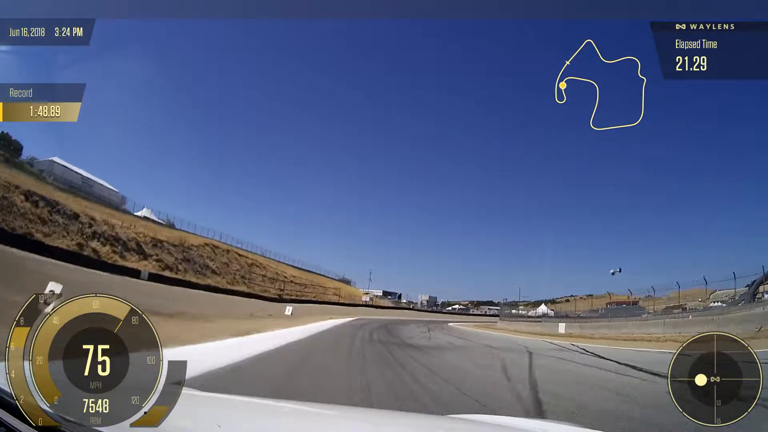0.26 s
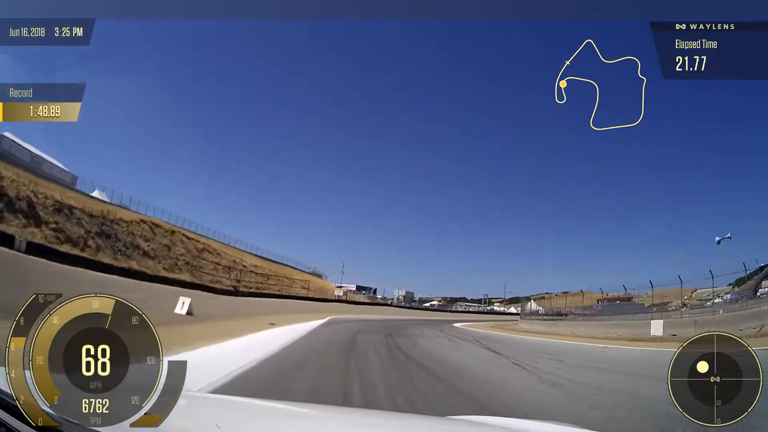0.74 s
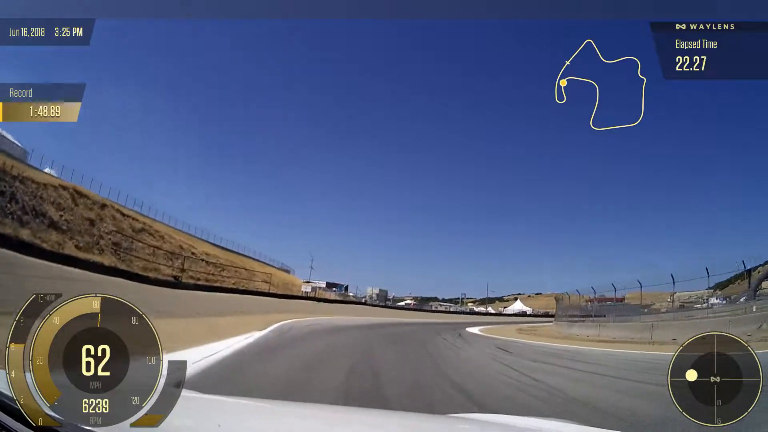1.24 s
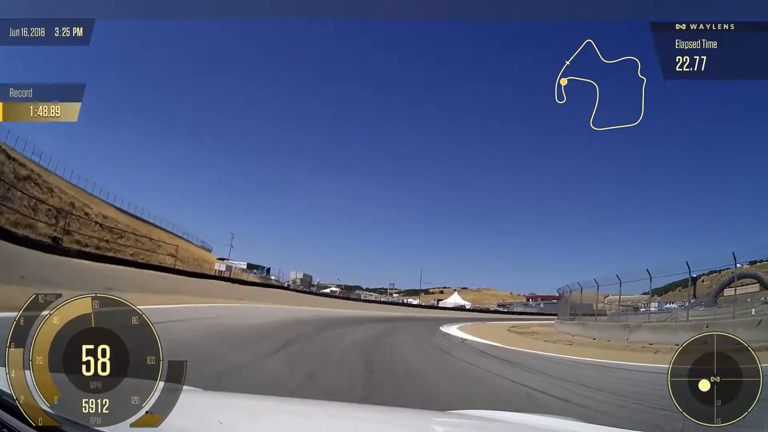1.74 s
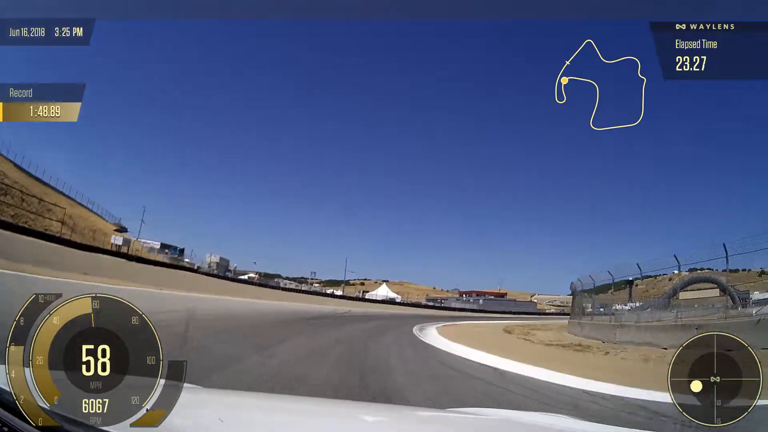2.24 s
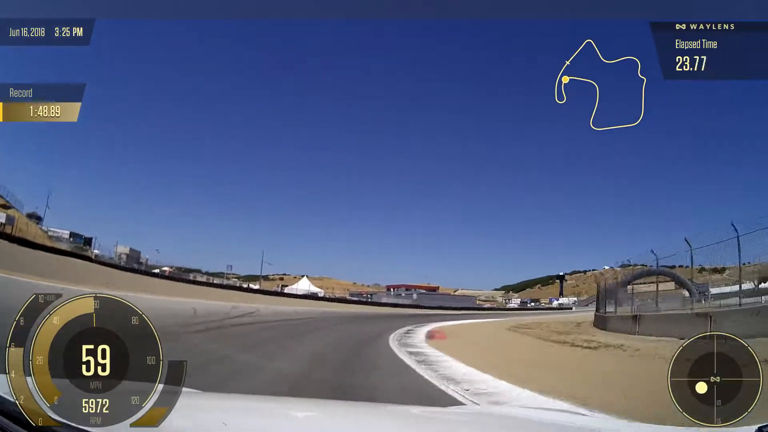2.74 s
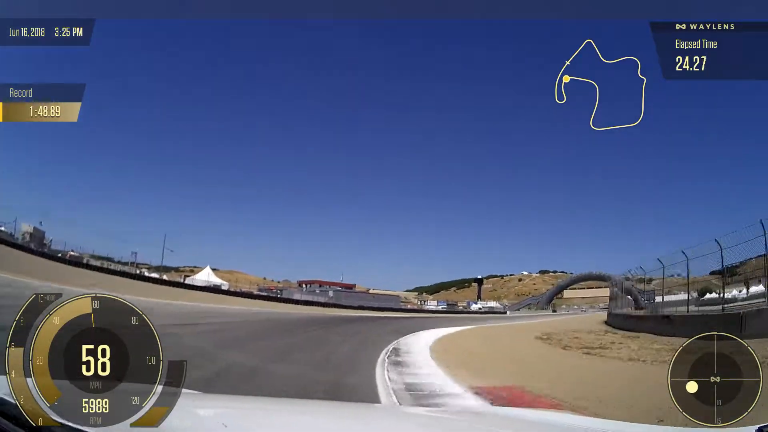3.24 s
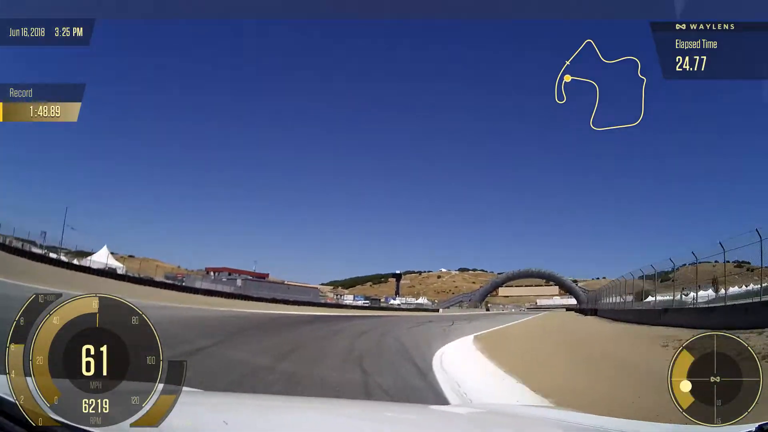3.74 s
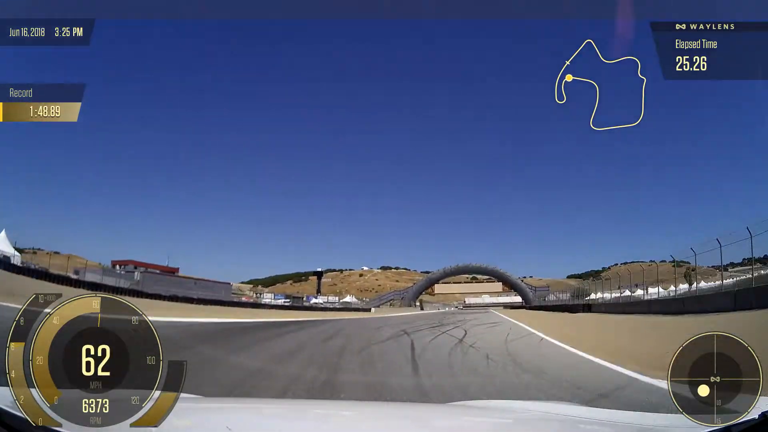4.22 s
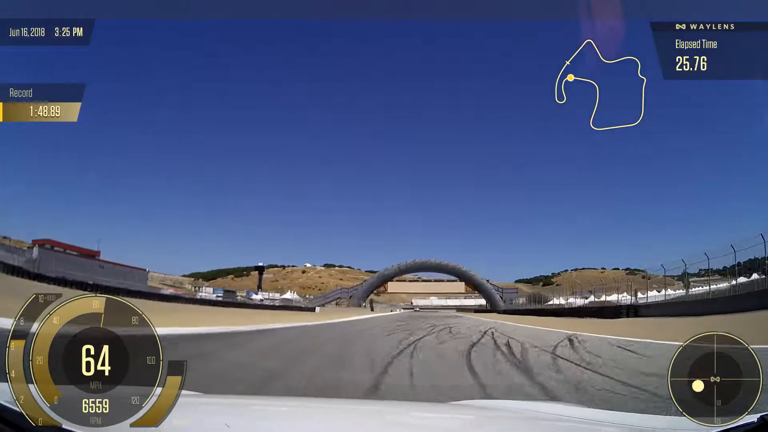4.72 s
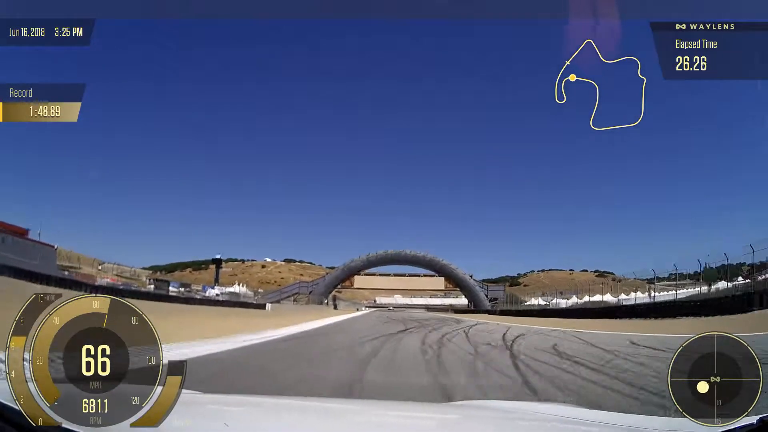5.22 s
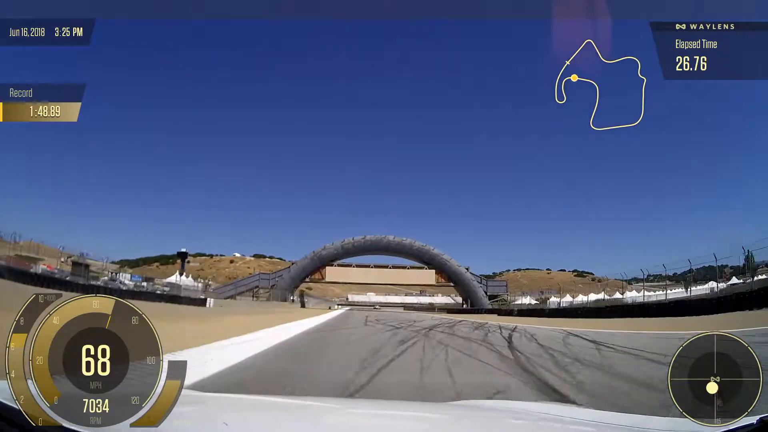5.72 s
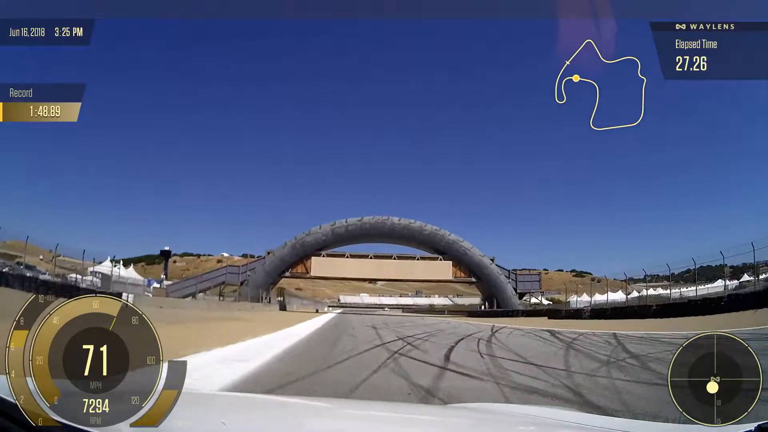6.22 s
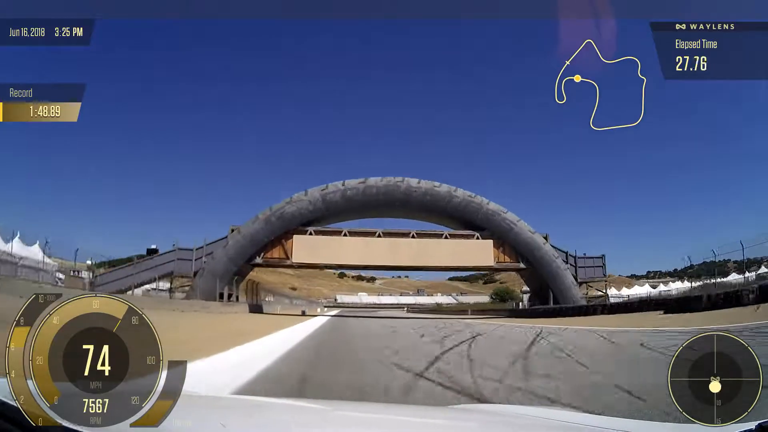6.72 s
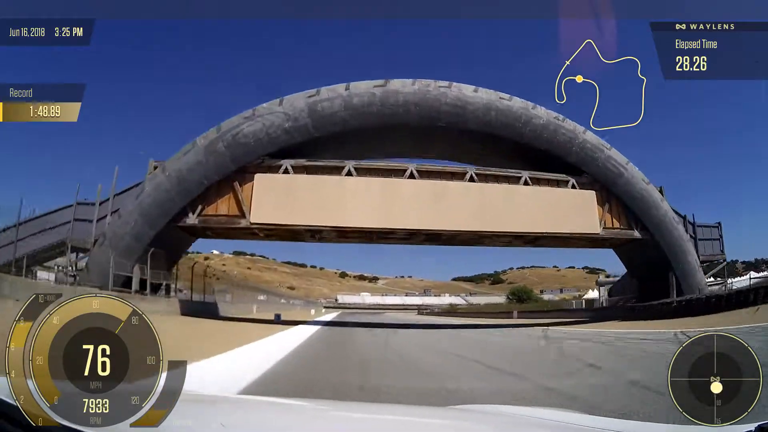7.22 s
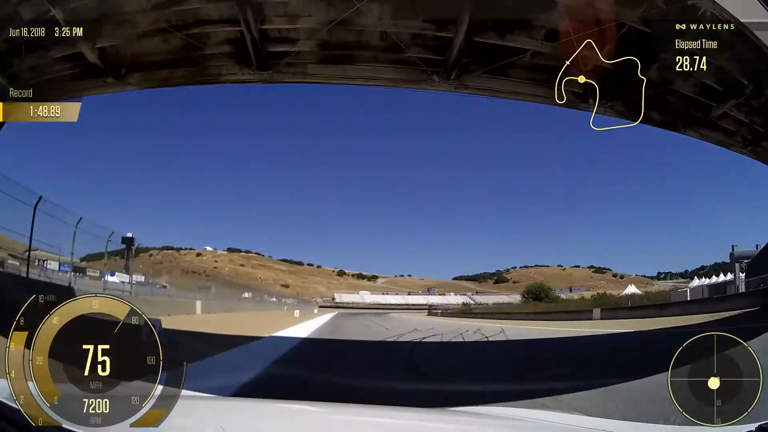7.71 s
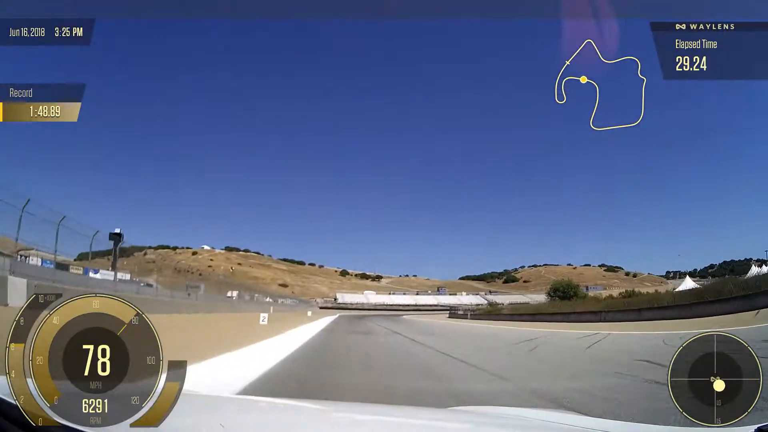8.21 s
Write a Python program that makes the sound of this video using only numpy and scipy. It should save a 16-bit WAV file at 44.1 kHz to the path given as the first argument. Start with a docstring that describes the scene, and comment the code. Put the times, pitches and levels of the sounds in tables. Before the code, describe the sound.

Inside a track car, a high-revving engine drops in pitch, coasts, climbs at full throttle and changes up over road rumble.

```python
"""A four-cylinder engine drones down on overrun, heard in the cabin as the car brakes on a race track.
It coasts through a bend, pulls to the top of the gear and shifts up. Harmonics of the engine cycle
sound through the body resonances and burble on abrupt load changes, over road rumble, tyre roar and
wind hiss. Loose trim ticks, the cabin knocks now and then, and the engine stumbles once with a thump."""
import sys
import numpy as np
from scipy import signal
from scipy.io import wavfile
from scipy.ndimage import uniform_filter1d

SR = 44100
rng = np.random.default_rng(int(sys.argv[2]) if len(sys.argv) > 2 else 0)


def transcribe(signal):
    """Save signal, clipped to [-1, 1], as a 16-bit WAV file at the path in sys.argv[1]."""
    frames = np.atleast_2d(signal).T
    limited = np.clip(frames, -1, 1)
    pcm = np.round(limited * 32767).astype(np.int16)
    wavfile.write(sys.argv[1], SR, pcm)


N = 373086

FIRING, OCTAVE = 4, 8  # harmonics of the engine cycle (two crank turns)
SHIFT_S, CRUISE_HZ = 7.3, 50
# (time [s], cycle rate [Hz], firing tone level [dB])
ENGINE_RUN = [(0.0, 72.35, -19.5), (0.09, 63.6, -22), (0.13, 63.87, -17.5), (0.25, 62, -26),
              (0.6, 56.77, -28), (0.82, 55.6, -25), (1.08, 52.79, -19.5), (1.46, 50.21, -19),
              (1.81, 48.97, -20), (2.0, 49.32, -20.5), (2.28, 50.14, -23.5), (2.52, 48.88, -35),
              (2.6, 49.82, -22.5), (2.9, 49.7, -28.5), (3.2, 49.95, -24.5), (3.41, 50.6, -15.5),
              (3.6, 51.44, -15), (3.8, 51.88, -17), (4.2, 52.78, -14), (4.59, 54.2, -14.5),
              (4.95, 55.5, -16), (5.18, 56.42, -17), (5.8, 58.9, -17.5), (7.02, 64.58, -19.5),
              (7.28, 65.76, -17.5), (7.33, 67.1, -28), (7.46, 65.45, -25), (7.52, 63.6, -32),
              (7.59, 61.96, -17), (7.72, 58.82, -29.5), (7.84, 56.26, -13), (7.93, 53.4, -13.5),
              (7.99, 51.79, -14), (8.2, 52.4, -13.5), (8.29, 52.77, -16), (8.4, 53.0, -18),
              (8.46, 52.2, -28)]
# (time [s], throttle opening [0-1])
PEDAL = [(0, 0.5), (.2, 0.04), (2.04, 0.08), (2.1, 0.29), (3.18, 0.24), (3.33, 0.58), (4.05, 0.77),
         (4.2, 0.98), (7.27, 0.96), (7.31, 0.51), (7.5, 0.23), (7.74, 0.23), (7.84, 1), (8.34, 0.96),
         (8.46, 0.67)]
# octave of the firing tone: (time [s], level [dB])
OCTAVE_LEVEL = [(0, -33.5), (.3, -43), (.7, -35.5), (1.3, -31), (1.7, -33), (2.1, -32), (2.8, -35.5),
                (3.12, -41), (3.22, -34), (3.3, -24), (3.42, -23), (3.54, -23), (3.58, -35), (3.63, -24),
                (3.69, -41), (3.74, -27), (3.92, -31), (4.14, -43), (4.34, -29.5), (4.6, -29), (4.9, -48),
                (5.25, -30), (5.6, -35.5), (6.0, -39), (6.35, -32), (6.75, -32.5), (7.1, -40.5),
                (7.4, -35.5), (7.77, -43), (7.83, -28), (7.88, -16), (7.92, -27), (7.96, -23.5),
                (8.02, -31.5), (8.08, -24), (8.19, -23.5), (8.27, -31.5), (8.33, -25), (8.46, -26)]
OPENINGS = (0, .25, .6, 1)  # overrun, coast, part, full throttle
# (harmonic, base level [dB] at each of the four openings)
HARMONIC_LEVELS = [(3, -37.5, -43.5, -32, -36.5), (5, -40, -39.5, -30, -21), (6, -34.5, -40.5, -34, -35.5),
                   (7, -43, -39, -39.5, -35), (9, -46, -47.5, -46, -36), (10, -44, -50.5, -46, -37.5),
                   (11, -59, -47.5, -44.5, -37.5), (12, -40.5, -49.5, -36.5, -34),
                   (13, -43.5, -49.5, -39, -37), (14, -59, -48.5, -43.5, -44.5), (15, -54, -52, -48.5, -45),
                   (16, -40.5, -60, -46, -45), (17, -54.5, -47.5, -53.5, -48), (18, -56, -49, -43.5, -46),
                   (19, -58, -51.5, -43, -47), (20, -66, -54, -49, -49.5), (21, -53, -47, -54.5, -54),
                   (22, -59, -61, -54, -50.5), (24, -59, -56, -47, -53.5)]
# harmonics that flutter about a steady level; the rest waver slowly
STEADY_HARMONICS = (4, 5, 6, 7, 8, 9, 10, 11, 12, 13, 14, 16, 17, 19, 20)
# remaining high harmonics, full throttle: (frequency [Hz], base level [dB])
RASP_SLOPE = [(1050, -34), (1300, -54), (1500, -60), (2000, -67.5), (2800, -64), (3400, -81)]
# body resonances and dead spots: (frequency [Hz], half width [Hz], gain [dB])
BODY_MODES = [(269.7, 15, 2.5), (331, 14.7, 3.5), (354, 9.2, -5.5), (401, 16, 5), (475, 11, -8),
              (579, 10, 2.5), (620.3, 9, -5), (630.5, 14, 6.5), (672.4, 9, 4.5), (748, 37, -4),
              (768, 14, 3.5), (962, 39, 6.5), (1036, 28, 5), (1172, 16, 7), (2090, 160, 7)]
# peaks and dips with engine speed: (harmonic, cycle rate [Hz], half width [Hz], gain [dB])
SPEED_SWELLS = [(6, 53.6, 2.2, 4.5), (7, 54.8, .6, -7.5), (9, 53.3, .5, -6.5), (9, 65.4, .6, -9),
                (10, 62.3, 1, -8), (14, 59.5, 1.6, 8), (14, 75, 1.1, -9), (16, 55.7, .6, -8),
                (16, 49, 0.69, 7), (13, 59, 0.73, -9), (13, 65.5, 0.83, -6), (12, 61.7, .6, -4),
                (15, 54.4, .9, -8), (10, 58.5, 1.5, 7.5), (11, 54, 0.88, 8.5), (12, 53, 1.3, 2),
                (12, 57, 1.1, 5.5), (12, 65, 1.3, 7.5), (13, 61, 1, 8), (16, 64.5, 2.1, 10),
                (17, 57.5, 1, 10), (20, 52.6, 1.8, 9)]
# brief flares and fades: (harmonic, time [s], half length [s], gain [dB])
TIMED_FLARES = [(12, 1.12, 0.16, 7), (20, 4.285, 0.2, 7), (12, 8.6, 0.023, -5), (12, 7.89, .025, 11.5),
                (5, 7.83, .05, 3), (20, 8.1, 0.1, 1.5), (16, 8.14, .08, 8.5), (6, 7.42, 0.076, 9),
                (14, 7.96, .05, 11), (11, 7.84, .04, 9), (16, 8.0, .04, -11), (21, 4.4, .4, 7.5),
                (24, 4.3, .45, 6), (12, .72, .22, -7), (6, 1.7, .3, -6), (6, 1, .35, 2)]
# after the shift: (harmonic, gain [dB])
GEAR_COLOUR = [(10, -5), (11, -6), (14, 3), (16, 5), (21, -8), (24, -9)]
# uneven firing on load changes: (time [s], half length [s], strength [0-1])
LOAD_BURBLES = [(.08, .1, .6), (7.417, 0.14, 0.74), (7.638, 0.065, 0.3), (7.88, 0.094, 0.45)]
# road and wind spectra: (frequency [Hz], relative density [dB])
RUMBLE_SPECTRUM = [(20, -28), (30, -13.5), (40, -1), (54, 2.5), (66, -1.5), (80, -8), (120, -7), (170, -9),
                   (300, -20.5)]
ROAR_SPECTRUM = [(90, -18.5), (150, 4), (280, 5), (350, 3.5), (430, 2), (540, -4), (680, 2), (1050, 0.5),
                 (1250, -8.5), (1420, -20.5), (2000, -29)]
HISS_SPECTRUM = [(1200, -15.5), (1600, 0.5), (2000, -5), (2900, 2.5), (3400, -7.5), (3900, -5.5),
                 (4700, -13), (5400, -10.5), (6000, -4.5), (6700, -12.5), (7700, -8), (9000, -14.5),
                 (11000, -16.5), (14500, -16.5)]
# rows rumble, roar, hiss: (base level [dB], wheel speed [dB/octave], engine speed [dB/octave],
# full throttle [dB], braking [dB per octave/s])
NOISE_LAWS = [(-30.5, 5, 1.5, -1.2, 6.5), (-35, 5, 1.2, -0.15, 0), (-51.5, 11.5, 7.5, 0.5, 5.5)]
# track bumps, rumble swells or dips: (time [s], gain [dB], half length [s])
TRACK_BUMPS = [(0.063, 3, 0.19), (2.04, 1.5, 0.085), (2.782, -5, .1), (3.4, 5.5, 0.13), (5.505, 1.5, 0.2),
               (7.38, 6, 0.15)]
# hiss swells or lulls: (time [s], gain [dB], half length [s])
WIND_GUSTS = [(.75, 2, 0.48), (8.2, -0.5, 0.11), (6.73, 1, .5)]
# cabin noise: (frequency [Hz], left-right correlation [-1 to 1])
COHERENCE = [(30, .996), (100, 1), (200, 0.99), (900, 1), (1250, 1), (1800, 0.15), (2800, 0.82),
             (3200, -0.061), (3700, .7), (4200, .15), (4600, 0.33), (5000, -0.8), (5500, -0.99),
             (6100, -0.98), (6900, 0.29), (7800, 0.8), (9300, 0.095), (14500, -.1)]
# loose trim: (time [s], gain [dB], dull part [dB], bright part [dB])
TRIM_TICKS = [(0.1511, -22, 2.5, -1), (1.0964, -27.5, -12, -16), (3.918, -36, -7, -6),
              (4.0964, -33, -9, -10), (4.1434, -37, -8, -5), (4.149, -28, -2, -3), (4.2049, -37, -6, 5),
              (4.258, -34, -5, -6), (4.2688, -41, -9, -8), (4.3155, -38, -5, -4), (4.3195, -28, -12, -3),
              (4.3513, -34, -7, -7), (4.4686, -38, -10, -6), (5.1605, -34, -8, -6), (5.1785, -32, -6, -2),
              (7.894, -31.5, -5, 2), (7.943, -31, -5, -6), (7.9526, -28, -5, -1), (7.9575, -27, -4, -3),
              (8.0008, -28, -2, -5), (8.1172, -32, -1, -7), (8.1449, -35, -8, -7), (8.2596, -33, -8, -7)]
# ring of a tick: (frequency [Hz], width [Hz], gain [dB])
TICK_RING = [(7800, 4000, 0.5), (4840, 1600, -9)]
# short cabin knocks, one low thump as the engine stumbles: (time [s], level [dB], pitch [Hz], t60 [s])
KNOCKS_AND_THUMP = [(0.999, -29, 1592, .02), (1.054, -24, 1518, 0.019), (1.114, -26, 1540, 0.026),
                    (2.0515, -15, 110, 0.051), (5.466, -31, 1720, 0.061), (6.109, -31, 1726, 0.062),
                    (6.35, -32, 1670, 0.065), (7.176, -33, 1740, 0.082)]

TIME_S = np.arange(N) / SR
FRAME_S = np.arange(0, N + 512, 512) / SR  # engine control grid
HIT_S = TIME_S[:1500]


def gain_of(db):
    return 10 ** (np.asarray(db) / 20)


def unit_rms(x):
    return x / np.sqrt(np.mean(x ** 2) + 1e-20)


def smoothed(x, size):
    return unit_rms(uniform_filter1d(x, size))


def bell(x, centre, half_width):
    return np.exp(-((x - centre) / half_width) ** 2)


def at_hz(table, hz):
    f, value = np.transpose(table)
    return np.interp(np.log(hz + 1), np.log(f + 1), value)


def curves(table, times_s=TIME_S):
    s, *columns = np.transpose(table)
    return [np.interp(times_s, s, column) for column in columns]


def add(mix, s, sound):
    part = mix[:, round(s * SR):][:, :sound.shape[1]]
    part += sound[:, :part.shape[1]]


def band(x, hz, width_hz):
    edges_hz = [hz - width_hz / 2, hz + width_hz / 2]
    return signal.sosfilt(signal.butter(2, edges_hz, "bandpass", fs=SR, output="sos"), x)


def harmonic_db(k, cycle_hz, firing_db, throttle):
    """Level of harmonic k, set by load, speed, gear and body resonances."""
    if k == FIRING:
        return firing_db
    if k == OCTAVE:
        return curves(OCTAVE_LEVEL, FRAME_S)[0]
    body_db = sum(db * bell(k * cycle_hz, hz, width) for hz, width, db in BODY_MODES)
    levels_db = {m: db for m, *db in HARMONIC_LEVELS}
    if k in levels_db:
        gear_db = dict(GEAR_COLOUR).get(k, 0) * (FRAME_S > SHIFT_S)
        swell_db = sum(db * bell(cycle_hz, hz, width) for m, hz, width, db in SPEED_SWELLS if m == k)
        return np.interp(throttle, OPENINGS, levels_db[k]) + body_db + gear_db + swell_db
    lift_db, shut_db = (5.5, -16.5) if k % FIRING == 0 else (0, -18.5)
    return at_hz(RASP_SLOPE, k * cycle_hz) + body_db + lift_db + shut_db * (1 - throttle)


def engine(cycle_rad, waver_db=2.5, burble_db=5.5, burble_rad=1.2):
    """Harmonics of the cycle; each wavers in level and phase as combustion varies."""
    cycle_hz, firing_db = curves(ENGINE_RUN, FRAME_S)
    throttle = curves(PEDAL, FRAME_S)[0]
    slew_hz_per_s = uniform_filter1d(abs(np.gradient(curves(ENGINE_RUN)[0])) * SR, 4096)
    roughness = 1 + np.tanh(np.interp(FRAME_S, TIME_S, slew_hz_per_s) / 15)
    burble = sum(strength * bell(FRAME_S, s, half) for s, half, strength in LOAD_BURBLES)
    shape = (56, len(FRAME_S))
    waver, drift = smoothed(rng.standard_normal((2, *shape)), 12)
    flutter = roughness * smoothed(rng.standard_normal(shape), 3)
    start_rad = rng.uniform(0, 2 * np.pi, 56)
    start_rad[[FIRING, OCTAVE]] = np.pi  # aligned: one pressure dip per firing
    level_lumps, phase_lumps = burble * smoothed(rng.standard_normal((2, *shape)), 2)
    burble_offset_db = np.log(10) / 20 * (burble_db * burble) ** 2  # holds mean power
    drone = np.zeros(N)
    for k in range(3, 56):
        db = harmonic_db(k, cycle_hz, firing_db, throttle)
        db = db + sum(lift * bell(FRAME_S, s, half) for m, s, half, lift in TIMED_FLARES if m == k)
        db += burble_db * level_lumps[k] - burble_offset_db
        if k == FIRING:
            jitter_db, drift_rad = 0.27 * flutter[k], 0
        elif k in STEADY_HARMONICS:
            jitter_db, drift_rad = 1.12 * np.sqrt(k / 8) * flutter[k], 0.25 * drift[k]
        else:
            jitter_db, drift_rad = waver_db * waver[k], 0.51 * drift[k]
        phase_rad = start_rad[k] + drift_rad + burble_rad * phase_lumps[k]
        phasor = gain_of(db + jitter_db) * np.exp(1j * phase_rad)
        drone += (np.interp(TIME_S, FRAME_S, phasor) * np.exp(1j * k * cycle_rad)).real
    return np.sqrt(2) * drone


def engine_cycle(skip_s=2.066, half_s=.005, depth=.95, step_hz=1.0, settle_s=.14, lost_firings=.5):
    """Cycle angle and drone gain; the drone skips once as a firing drags and the speed steps up."""
    u = (TIME_S - skip_s) / half_s
    cycle_hz = curves(ENGINE_RUN)[0] + step_hz * np.tanh(u) * np.exp(-abs(u) * half_s / settle_s)
    lost_cycles = lost_firings / FIRING * (1 + np.tanh(u + 1.5)) / 2
    cycle_rad = 2 * np.pi * (np.cumsum(cycle_hz) / SR - lost_cycles)
    return cycle_rad, 1 - depth * bell(TIME_S, skip_s, half_s)


def cabin_noise(spectrum, band_hz, patch_db, flicker_db, size):
    """Stereo noise with drifting spectral patches and broadband flicker; rms 1 within band_hz."""
    frames, hz = 4 * N // size + 5, np.fft.rfftfreq(size, 1 / SR)
    a, b, c, d, patches = rng.standard_normal((frames, len(hz), 5)).T
    patches = smoothed(uniform_filter1d(patches, 10, axis=0), 10240 // size)
    flicker = smoothed(rng.standard_normal(frames), 3)
    coherence = at_hz(COHERENCE, hz)[:, None]
    mid = np.sqrt(1 + coherence) * (a + 1j * b)
    side = np.sqrt(1 - coherence) * (c + 1j * d)
    outside = (hz < spectrum[0][0]) | (hz > 1.5 * spectrum[-1][0])
    shape_db = (at_hz(spectrum, hz) - 80 * outside)[:, None]
    bins = np.array([mid + side, mid - side])
    bins *= gain_of(shape_db + patch_db * patches + flicker_db * flicker)
    bins[0] *= gain_of(-.7 * (hz > 4000) * (hz < 11000))[:, None]  # left treble is shaded
    power = (abs(bins) ** 2).sum(axis=(0, 2))
    share = power[(hz > band_hz[0]) & (hz < band_hz[1])].sum() / power.sum()
    noise = signal.istft(bins, nperseg=size, noverlap=3 * size // 4)[1][:, :N]
    return unit_rms(noise) / np.sqrt(share)


def noise_levels_db():
    """Rumble, roar and hiss levels; the wheels follow the engine until the shift, then hold speed."""
    revs_oct = np.log2(curves(ENGINE_RUN)[0] / CRUISE_HZ)
    wheels_oct = np.where(TIME_S < SHIFT_S, revs_oct, revs_oct[round(SHIFT_S * SR)])
    slowing = uniform_filter1d(-np.gradient(wheels_oct) * SR, SR // 2, mode="nearest")
    braking = np.clip(slowing, 0, .4)
    intake = uniform_filter1d(curves(PEDAL)[0], SR // 4, mode="nearest")  # air flow responds slowly
    return [db + a * wheels_oct + b * revs_oct + c * intake + d * braking
            for db, a, b, c, d in NOISE_LAWS]


def road_rumble(level_db):
    """Low noise from the track, swelling and dipping over bumps."""
    bump_db = sum(db * bell(TIME_S, s, half) for s, db, half in TRACK_BUMPS)
    noise = cabin_noise(RUMBLE_SPECTRUM, (25, 140), patch_db=0.6, flicker_db=0.76, size=4096)
    return gain_of(level_db + bump_db) * noise


def tyre_roar(level_db, cycle_rad, throb=0.046):
    """Midrange tyre noise; surges out of the bend, throbs once per engine cycle."""
    surge_db = 2.4 * bell(TIME_S, 4.2, 0.53)
    noise = cabin_noise(ROAR_SPECTRUM, (850, 1300), patch_db=.5, flicker_db=1.16, size=2048)
    return gain_of(level_db + surge_db) * noise * (1 + throb * np.cos(cycle_rad))


def wind_hiss(level_db):
    """Treble air noise with gusts and lulls."""
    gust_db = sum(db * bell(TIME_S, s, half) for s, db, half in WIND_GUSTS)
    noise = cabin_noise(HISS_SPECTRUM, (3000, 14000), patch_db=0.96, flicker_db=0.66, size=1024)
    return gain_of(level_db + gust_db) * noise


def trim_ticks(faint_per_s=14, faint_db=-50.5, rise_s=0.0007, chatter_db=-14.5, chatter_s=.014):
    """Rattling contacts of loose trim; faint random ones grow as the firing tone shakes it."""
    ticks, faint = np.zeros((2, N)), []
    for place, size in rng.random((round(faint_per_s * N / SR), 2)):
        s = place * N / SR
        shake_db = .7 * (curves(ENGINE_RUN, s)[1] + 18)
        faint.append((s, faint_db + 7 * size + shake_db, -4, -7))
    contact = HIT_S / rise_s * np.exp(1 - HIT_S / rise_s)
    chatter = gain_of(chatter_db) * np.exp(-HIT_S / chatter_s)
    for s, db, dull_db, bright_db in TRIM_TICKS + faint:
        snap = rng.standard_normal((2, len(HIT_S))) * (contact + chatter)
        ring = sum(gain_of(ring_db) * band(snap, hz, width) for hz, width, ring_db in TICK_RING)
        dull = gain_of(dull_db) * band(snap[:1], hz=2500, width_hz=2600)
        bright = gain_of(bright_db) * band(snap, hz=12400, width_hz=4400)
        add(ticks, s, gain_of(db) * (ring + dull + bright))
    return ticks


def knocks_and_thump(attack_s=0.0025):
    """Short cabin knocks and the low thump of the engine stumble; each is one damped tone."""
    hits = np.zeros((1, N))
    for s, db, hz, t60_s in KNOCKS_AND_THUMP:
        envelope = gain_of(db - 60 * HIT_S / t60_s) * np.minimum(HIT_S / attack_s, 1)
        add(hits, s, (envelope * np.sin(2 * np.pi * hz * HIT_S))[None])
    return hits


def scene():
    """Stereo cabin mix; the left side is farther from engine and road, two samples late."""
    cycle_rad, skip_gain = engine_cycle()
    drone = engine(cycle_rad) * skip_gain
    rumble_db, roar_db, hiss_db = noise_levels_db()
    left, right = drone + road_rumble(rumble_db) + tyre_roar(roar_db, cycle_rad)
    left = np.pad(left[:-2], (2, 0))
    return np.array([left, right]) + wind_hiss(hiss_db) + trim_ticks() + knocks_and_thump()


def record(dry):
    """Left channel slightly weaker; low-pass at 14.3 kHz."""
    balanced = dry * gain_of([[-.2], [.2]])
    lowpass = signal.firwin(1023, 14300, window=("kaiser", 9), fs=SR)
    return signal.oaconvolve(balanced, lowpass[None], "same")


dry = scene()
out = record(dry)
transcribe(out)
```